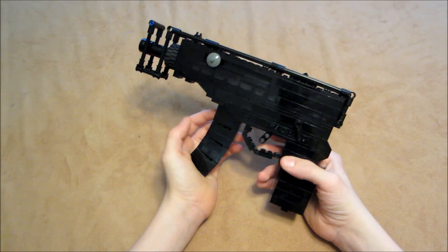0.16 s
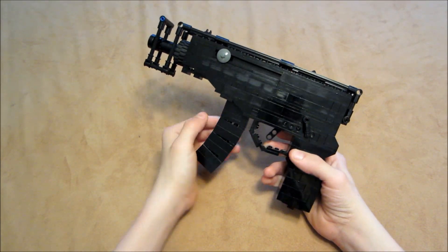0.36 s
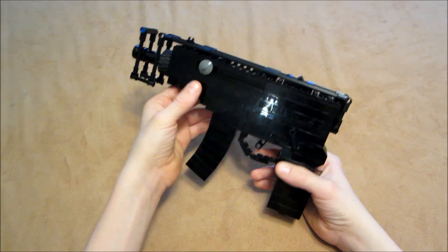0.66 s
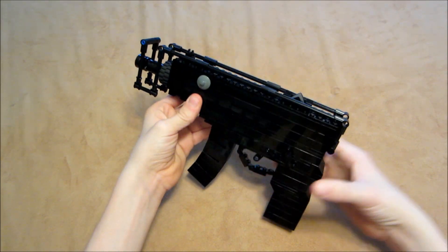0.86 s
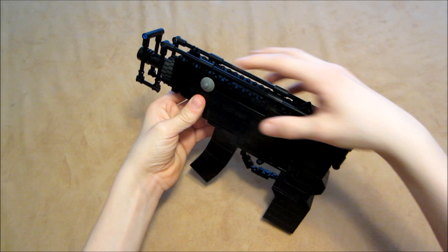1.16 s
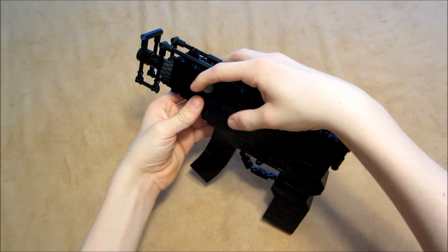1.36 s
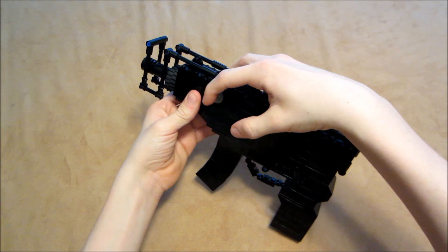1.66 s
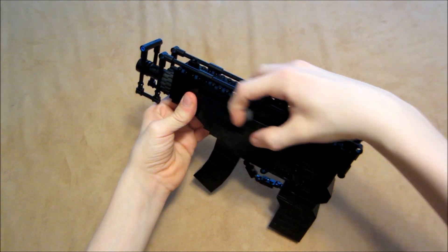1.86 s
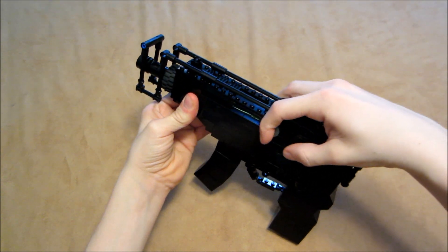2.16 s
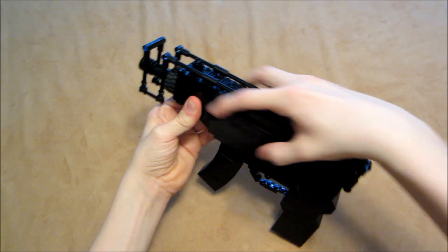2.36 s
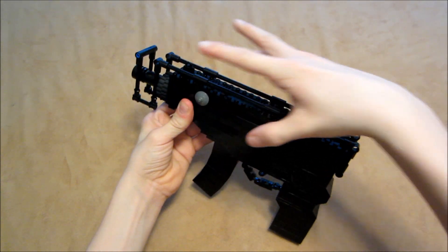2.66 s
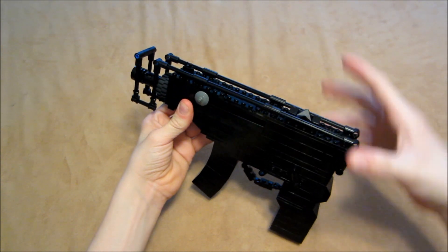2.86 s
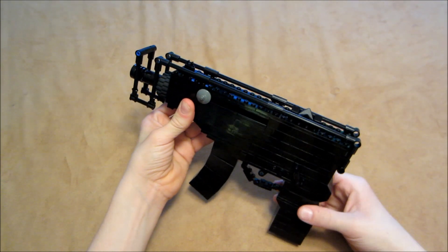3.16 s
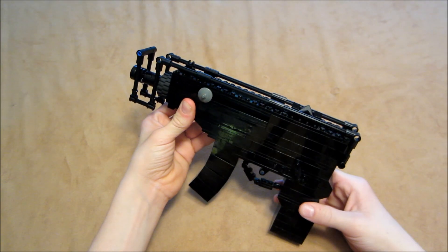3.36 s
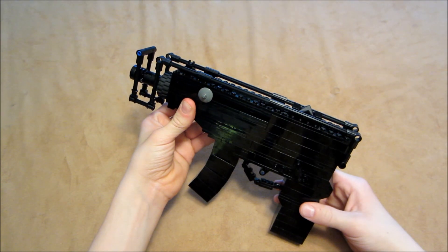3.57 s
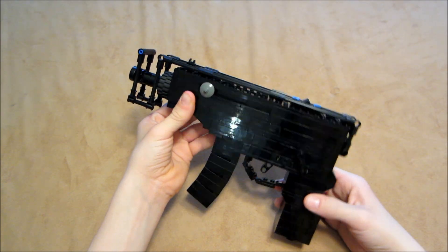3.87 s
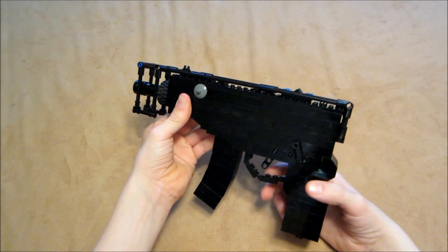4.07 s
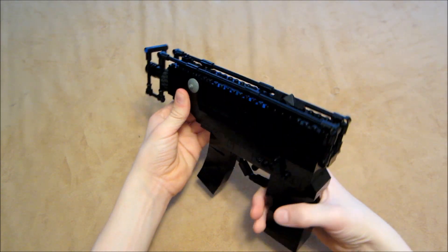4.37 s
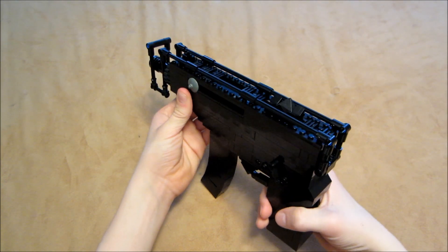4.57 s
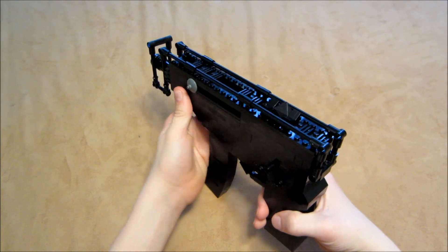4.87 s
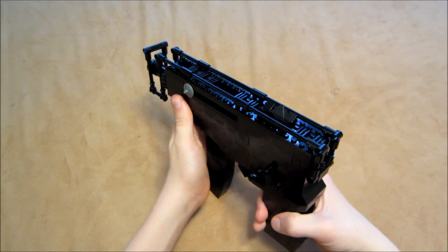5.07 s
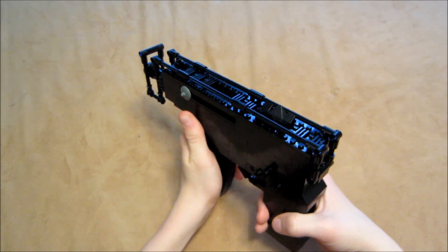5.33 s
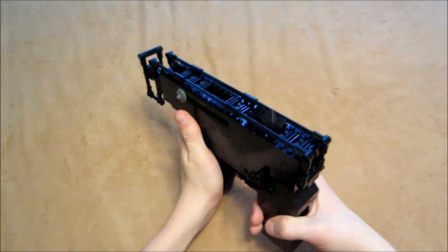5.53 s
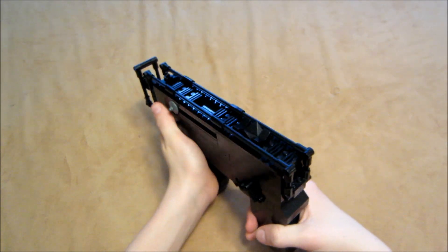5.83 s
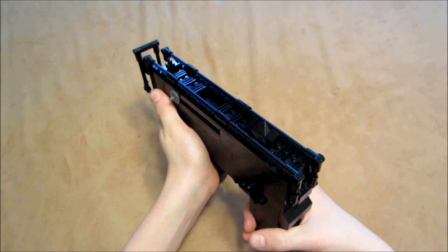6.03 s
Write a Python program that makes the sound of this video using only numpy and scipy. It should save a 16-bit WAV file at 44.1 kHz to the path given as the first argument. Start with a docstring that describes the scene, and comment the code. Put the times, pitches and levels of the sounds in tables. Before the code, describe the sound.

Hands turn over a hard plastic brick model in a quiet room: low table thumps, a flurry of clicks, then one sharp loud snap.

```python
"""A quiet room with a wooden table, on which a model of hard plastic bricks is handled.
Bumps ring the table's modes; bricks strike with filtered contacts and chatter, and loose ones rattle.
Sliding parts hiss and slip along the plastic, and one piece snaps home, ringing the hollow shell.
Fingers brush as swells of hiss; a lens motor ticks on a clock over air noise, sine hum and a fan whine."""
import sys
import numpy as np
from scipy import signal
from scipy.fft import rfft, irfft
from scipy.io import wavfile

SR = 44100
rng = np.random.default_rng(int(sys.argv[2]) if len(sys.argv) > 2 else 0)


def wav_out(sig):
    """Save sig, one row per channel (or a flat mono array), as 16-bit PCM at SR to the path in sys.argv[1]."""
    wavfile.write(sys.argv[1], SR, np.round(np.clip(np.atleast_2d(sig).T, -1, 1) * 32767).astype(np.int16))


N = 273420

# model bumps table: (time [s], level before the wood's low-pass [dB],
# contact low-pass [Hz], rebound high-pass [Hz])
KNOCKS = [(0.9493, -11.5, 184, 87), (0.9666, -16.5, 162, 87), (1.059, -34.5, 194, 80),
          (1.634, -34, 127, 70), (1.691, -34, 118, 55), (1.749, -31, 96, 35), (2.122, -31.5, 179, 98),
          (2.484, -29, 135, 45), (3.286, -24, 120, 69), (4.5972, -12, 633, 96), (4.605, -28, 520, 95),
          (4.6187, -17.5, 404, 65), (5.152, -35, 255, 50), (5.844, -38, 757, 250), (5.846, -21, 77.5, 30)]
# plastic pushed along plastic: (start [s], length [s], level [dB])
SLIDES = [(1.906, 0.1, -57.5), (2.446, 0.057, -48.5), (4.574, 0.023, -54.5), (5.456, .13, -59.5),
          (5.695, .07, -61.5)]

SLIDE_ATTACK_S, SLIDE_RELEASE_S = 0.025, 0.022  # time constants


def amp(db):
    """Decibels to gain."""
    return 10 ** (np.asarray(db) / 20)


def evened(x):
    """Scales to rms 1."""
    return x / np.sqrt(np.mean(x ** 2) + 1e-20)


def sized(x, span_s):
    """Scales a blow to the energy of rms 1 held for span_s."""
    return x / np.sqrt(np.sum(x ** 2) / (span_s * SR) + 1e-20)


def read(points, hz):
    """Interpolates a curve on a log-frequency axis."""
    f, value = np.transpose(points)
    return np.interp(np.log(hz + 1), np.log(f + 1), value)


def add(mix, time_s, sound):
    """Mixes a sound in at time_s."""
    part = mix[max(round(time_s * SR), 0):][:len(sound)]
    part += sound[:len(part)]


def coloured(x, points):
    """Filters a full-length sound by a dB curve."""
    gain = amp(read(points, np.fft.rfftfreq(N, 1 / SR)))
    return irfft(rfft(x) * gain, N)


def causal(gain, size=2048):
    """Minimum-phase impulse response with this gain, by folding the cepstrum."""
    cepstrum = irfft(np.log(gain + 1e-6))
    cepstrum[1:size // 2] *= 2
    cepstrum[size // 2 + 1:] = 0
    return irfft(np.exp(rfft(cepstrum)))


def bins(size=2048):
    """Frequencies [Hz] of a short impulse response."""
    return np.fft.rfftfreq(size, 1 / SR)


def background(air_rms_db=-52.5, waver=0.03):
    """Partly correlated stereo air noise, plus hum and whine lines that waver in level and phase."""
    # room air spectrum: (frequency [Hz], relative level [dB per Hz])
    air_colour = [(12, -24), (22, -9), (35, 1.5), (50, -8), (100, -6.5), (167, -8.5), (600, -18.5),
                  (1100, -23.5), (1430, -29), (1740, -30.5), (2720, -42.5), (6100, -47), (7600, -63.5),
                  (10000, -50), (13000, -46.5), (16000, -47.5)]
    # left-right correlation of the air: (frequency [Hz], correlation [1])
    likeness = [(30, 0.57), (120, 0.34), (500, 0.22), (1500, 0.19), (4000, 0.087), (15000, 0.09)]
    # mains hum and faint fan whine: (frequency [Hz], nominal rms before channel offset [dB])
    hum_lines = [(120, -55.5), (240, -65), (360, -68), (480, -73), (600, -73), (1089, -71.5), (1741, -87.5),
                 (7865, -99), (15735, -96.5)]
    t = np.arange(N) / SR
    a, b = rfft(rng.standard_normal((2, N)))
    same = np.clip(read(likeness, np.fft.rfftfreq(N, 1 / SR)), -1, 1)
    left_right = np.array([a, same * a + np.sqrt(1 - same ** 2) * b])
    air = evened(coloured(irfft(left_right, N), air_colour))
    knots = np.linspace(0, t[-1], num=40)
    hum = 0
    for hz, db in hum_lines:
        swell, drift = (np.interp(t, knots, row) for row in rng.standard_normal((2, len(knots))))
        level = np.sqrt(2) * amp(db) * (1 + waver * swell)
        phase = 2 * np.pi * (hz * t + rng.random()) + waver * drift * np.sqrt(hz / 120)
        hum += level * np.sin(phase)
    channel_offset = amp([[-0.5], [0.5]])
    return (amp(air_rms_db) * air + hum) * channel_offset


def rattle(decay_s, amount):
    """One contact, then a dying chatter of tiny ones, flattened to a fairly even spectrum."""
    t = np.arange(len(bins())) / SR
    force = rng.standard_normal(len(t)) * np.exp(-t / decay_s) * (1 - np.exp(-3 * t / decay_s))
    force *= amount / np.linalg.norm(force)
    force[0] = 1
    gain = abs(rfft(force, 2 * len(t) - 2))
    flattener = causal(1 / (gain + gain.mean() / 3))
    return signal.fftconvolve(force, flattener)[:2 * len(t)]


def ticks(span_s=0.0023, decay_s=0.0018, chatter=1.7, cycle_s=0.2085, beats_s=(0.0099, 0.1419),
          spread_db=1.8):
    """A lens motor steps on a steady clock, two thin ticks a cycle, while it adjusts."""
    # tick spectrum: (frequency [Hz], relative level [dB per Hz])
    tick_colour = [(500, -42), (2600, -18), (3800, 11.5), (5200, -4), (8000, -19), (12500, -0.5),
                   (16000, -19.5)]
    # spells of adjusting: (start [s], end [s], median tick level [dB])
    lens_spells = [(0.18, 1.72, -66.5), (3.3, 3.4, -62.5), (3.64, 3.82, -67.5), (4.14, 5.27, -67.5)]
    out, ring = np.zeros(N), causal(amp(read(tick_colour, bins())))
    clock = np.add.outer(np.arange(0, N / SR, cycle_s), beats_s).ravel()
    for start, end, db in lens_spells:
        for s in clock[(clock > start) & (clock < end)]:
            level = amp(db + spread_db * rng.standard_normal())
            tick = signal.fftconvolve(rattle(decay_s, chatter), ring)
            add(out, s, level * sized(tick, span_s))
    return out


def brushes():
    """Skin moving over the bricks gives soft swells of high hiss."""
    # strokes of skin: (middle [s], peak level [dB], half-length [s])
    brush_strokes = [(0.389, -62, .034), (0.725, -66, 0.19), (0.99, -65, 0.068), (1.66, -65.5, .11),
                     (1.998, -58.5, 0.26), (2.5, -60.5, 0.19), (4.983, -59, 0.067), (5.712, -62, 0.23),
                     (5.924, -64.5, .14)]
    # skin hiss spectrum: (frequency [Hz], relative level [dB per Hz])
    skin_colour = [(1000, 0), (3000, -12), (5500, -2.5), (7800, -19.5), (10000, -3), (12500, -3),
                   (16000, 6.5)]
    speed = np.zeros(N)
    for s, db, half_s in brush_strokes:
        add(speed, s - half_s, amp(db) * np.hanning(int(2 * half_s * SR)) ** 2)
    return speed * evened(coloured(rng.standard_normal(N), skin_colour))


def shell():
    """The hollow shell's short ring after one contact: decaying modes of alternating sign."""
    # brick shell modes: (frequency [Hz], relative level [dB], t60 [s])
    shell_modes = [(700, -22, .006), (1120, -17, .009), (1565, 0, .012), (2180, 0, .014), (2830, -14, .012),
                   (3680, -17, .009), (4450, -15, .007), (5000, -11, .008), (6600, -25, .003),
                   (9200, -19, .003), (10700, -9, .004), (11900, -13, .004), (13800, -12, .003)]
    t = np.arange(2 * len(bins()) - 2) / SR
    return sum((-1) ** k * amp(db - 60 * t / t60) * np.sin(2 * np.pi * hz * t)
               for k, (hz, db, t60) in enumerate(shell_modes))


def stroke(t, start, length, db):
    """Finger pressure builds, holds and lets go."""
    before = np.maximum(start - t, 0)
    after = np.maximum(t - start - length, 0)
    return amp(db) * np.exp(-before / SLIDE_ATTACK_S - after / SLIDE_RELEASE_S)


def slides(slips_per_s=450, spread_db=5, hiss_share=1.0, grit_hz=2400, ring_share=0.54):
    """Sliding plastic hisses, and catches in small uneven slips that knock and ring the shell."""
    # sliding hiss spectrum: (frequency [Hz], relative level [dB per Hz])
    slide_colour = [(200, 9.5), (700, 7.5), (1200, -2.5), (2200, -9), (2900, -20), (4800, -6.5),
                    (7800, -21), (11000, -8.5), (16000, -15)]
    t = np.arange(N) / SR
    slips = (rng.random(N) < slips_per_s / SR).astype(float)
    slips *= amp(spread_db * np.minimum(rng.exponential(1, N), 2.5))
    slips *= rng.choice([-1, 1], N)
    ring = signal.oaconvolve(slips, shell())[:N]
    band = signal.butter(N=3, Wn=[900, grit_hz], btype="band", fs=SR, output="sos")
    grit = evened(signal.sosfilt(band, slips)) + ring_share * evened(signal.sosfilt(band, ring))
    hiss = evened(coloured(rng.standard_normal(N), slide_colour))
    pressure = sum(stroke(t, *row) for row in SLIDES)
    return pressure * evened(evened(grit) + hiss_share * hiss)


def bumps(push_db=-12.5, follow_db_per_db=0.42, soft_hz=140, low_hz=70, lead_s=0.01195):
    """All bumps on the table: the knocks, and the soft push just before each stroke."""
    pushes = [(s - lead_s, push_db + follow_db_per_db * db, soft_hz, low_hz) for s, _, db in SLIDES]
    return KNOCKS + pushes


def knocks(span_s=0.0035):
    """Each bump rings the table top; a soft contact reaches only the low modes."""
    # table modes, a mix of short thuds and longer rings: (frequency [Hz], relative level [dB], t60 [s])
    table_modes = [(79.8, 2, 0.25), (117.5, 10, 0.14), (284, 2, 0.039), (431, 4, 0.053), (61.4, 0.5, 0.44),
                   (133, 0.5, 0.25), (175, -1, 0.14), (211.8, -5, 0.35), (251.5, -1, 0.26),
                   (304.5, 0.5, 0.2), (406, -4, 0.16), (477, -9, 0.37), (513, -23, 0.51), (543, -23, 0.18),
                   (670, 2.5, 0.11), (727, -7.5, 0.28), (842, -17.5, 0.82)]
    t, out = np.arange(SR * 3 // 4) / SR, np.zeros(N)
    ring = sum(amp(db - 60 * t / t60) * np.cos(2 * np.pi * hz * t) for hz, db, t60 in table_modes)
    for s, db, soft_hz, low_hz in bumps():
        contact = signal.butter(N=3, Wn=soft_hz, fs=SR, output="sos")
        rebound = signal.butter(N=2, Wn=low_hz, btype="high", fs=SR, output="sos")
        blow = signal.sosfilt(np.vstack([contact, rebound]), ring)
        add(out, s, amp(db) * sized(blow, span_s))
    wood = signal.butter(N=4, Wn=900, fs=SR, output="sos")  # wood passes little treble
    return signal.sosfilt(wood, out)


def loose_bricks(count=6, shake_db=-31, shake_gap_s=0.014, fade_db_per_s=130,
                 catch_db=6.5, catch_gap_s=0.02, spread_db=3,
                 median_hz=1586, spread_oct=0.35, treble_db=-12, chatter_s=0.0052):
    """Small uneven clicks: a dying few shaken out by each knock, and catches along each stroke."""
    shaken = [(s + wait, db + shake_db - fade_db_per_s * wait) for s, db, _, _ in KNOCKS
              for wait in shake_gap_s * (np.arange(count) + rng.random(count))]
    caught = [(s + wait, db + catch_db) for s, length, db in SLIDES
              for wait in catch_gap_s * (np.arange(2 * count) + rng.random(2 * count))
              if wait < length + SLIDE_RELEASE_S]
    events = shaken + caught
    chance = rng.standard_normal((len(events), 2))
    return [(s, db + spread_db * force, treble_db, median_hz * 2 ** (spread_oct * part), chatter_s)
            for (s, db), (force, part) in zip(events, chance)]


def clicks(span_s=0.001, chatter=2.8, treble_hz=2500, part_db=7, part_width_hz=110):
    """Brick strikes brick: a sharp contact and brief chatter ring the struck part at its own pitch. One faint
    bright click at 3.26 s is a tick of the lens motor."""
    # strikes, and one lens tick at 3.26 s: (time [s], level [dB], treble tilt reached two octaves above
    # treble_hz [dB], pitch of the struck part [Hz], chatter decay [s])
    strikes = [(0.3873, -47.5, -8, 1240, 0.001), (0.953, -42, 4, 4360, .0025),
               (0.959, -33, -10, 1810, 0.0089), (1.355, -47, -7, 1220, 0.011),
               (1.374, -41.5, 6, 1330, 0.0058), (1.4335, -45, -21.5, 1160, 0.0014),
               (1.468, -45.5, 7, 2420, 0.0036), (1.521, -49.5, -5, 1440, 0.011),
               (1.896, -37.5, -26, 2030, 0.0076), (2.0, -28, -4.5, 1470, 0.0019),
               (2.0451, -40.5, -18, 1180, 0.0014), (2.061, -43.5, 2, 2320, 0.0032),
               (2.124, -44.5, -8, 1310, 0.0027), (2.183, -33.5, 18, 2290, .0026),
               (2.372, -36, 16.5, 4060, .0008), (2.3835, -35, 18, 1030, 0.0013),
               (2.391, -38, 13, 2110, .0012), (2.397, -37.5, 13, 2142, 0.0024),
               (2.4297, -35.5, -4, 2000, .004), (2.4602, -27.5, 9, 1200, 0.00098),
               (2.502, -40, 9, 1130, .002), (3.2623, -52.5, 12, 3700, 0.0012),
               (4.481, -43.5, 6, 1320, 0.004), (4.548, -36.5, -2, 1180, 0.0092),
               (4.592, -32, -3, 1180, 0.0035), (4.605, -30.5, -6, 2970, 0.0015),
               (4.615, -33.5, 1, 3080, 0.0017), (4.929, -49, 5, 2170, 0.0055),
               (5.148, -42, -2, 1330, 0.0019), (5.4797, -23, 12.5, 2170, 0.0021),
               (5.8438, -39.5, 0, 1210, .0014)]
    # click spectrum: (frequency [Hz], relative level [dB per Hz])
    click_colour = [(150, -20.5), (500, 2), (900, 1.5), (1300, 1.5), (2200, -1), (2900, -9.5), (3700, -8.5),
                    (5000, -11.5), (7800, -30), (11000, -20), (16000, -21)]
    hz, out = bins(), np.zeros(N)
    treble = np.clip(np.log2(hz / treble_hz + 1e-9) / 2, 0, 1)
    for s, db, treble_db, part_hz, decay_s in strikes + loose_bricks():
        part = 1 + amp(part_db) / (1 + ((hz - part_hz) / part_width_hz) ** 2)
        ring = causal(part * amp(read(click_colour, hz) + treble_db * treble))
        force = rattle(decay_s, chatter * np.sqrt(decay_s * 1000))  # longer chatter is stronger
        add(out, s, amp(db) * sized(signal.fftconvolve(force, ring), span_s))
    return out


def snap(span_s=0.00066, decay_s=0.0006, chatter=0.33, crack_db=-11):
    """One hard contact gives a dull crack and rings the whole shell cleanly."""
    # a piece snaps home: (time [s], level of the shell ring [dB])
    snaps = [(5.481, -12)]
    # crack spectrum: (frequency [Hz], relative level [dB per Hz])
    crack_colour = [(150, -15), (500, -6), (1100, 8), (3000, -3), (8000, -14), (16000, -23)]
    out = np.zeros(N)
    crack = sized(causal(amp(read(crack_colour, bins()))), span_s)
    ring = sized(shell(), span_s) + amp(crack_db) * crack
    for s, db in snaps:
        add(out, s, amp(db) * signal.fftconvolve(rattle(decay_s, chatter), ring))
    return out


def ports(x, left_lag_s=2.3e-5):
    """Two close microphone ports hear the direct sound with a small lag and imbalance."""
    # port imbalance: (frequency [Hz], left minus right [dB])
    port_balance = [(60, -0.3), (300, -1), (1200, -2), (2200, -4.5), (4400, -1.5), (8000, -.7),
                    (13000, -0.3)]
    hz = np.fft.rfftfreq(N, 1 / SR)
    half = amp(read(port_balance, hz) / 2) * np.exp(-1j * np.pi * hz * left_lag_s)
    return irfft(rfft(x) * np.array([half, 1 / half]), N)


def room(x, gap_s=0.00086, width=0.29, taps_per_s=4000):
    """Sparse reflections, each band dying at its own speed, much alike at the two ports."""
    # reverberation: (frequency [Hz], t60 [s])
    decay_times = [(60, 0.38), (250, 0.42), (750, 0.5), (2000, 0.2), (5000, 0.19), (15000, .16)]
    size = SR * 3 // 4
    taps = rng.choice([-1., 1.], (2, size)) * (rng.random((2, size)) < taps_per_s / SR)
    taps *= np.arange(size) > gap_s * SR
    hz, t, z = signal.stft(taps, SR, nperseg=256)
    decay = amp(-60 * t / read(decay_times, hz)[:, None])
    mid, side = signal.istft(z * decay, SR, nperseg=256)[1]
    tail = np.array([mid + width * side, mid - width * side])
    return signal.fftconvolve(x[None], tail / np.linalg.norm(tail[0]), axes=1)[:, :N]


def scene():
    """Table and plastic, heard directly and through the room, over the background."""
    # colour of the room's return: (frequency [Hz], gain [dB])
    echo_colour = [(60, 3.5), (200, 2), (700, 0.5), (2000, -0.5), (4000, -4), (8000, -5.5), (15000, -16.5)]
    small = ticks() + brushes()
    plastic = slides() + clicks()
    wood, latch = knocks(), snap()
    sent = amp(-11.5) * wood + amp(-7.0) * plastic + amp(-18.5) * latch + amp(-12) * small
    direct = ports(wood + plastic + latch + small)
    return direct + room(coloured(sent, echo_colour)) + background()


def record(dry, edge_hz=15980):
    """The recorder's band limit, a linear-phase low-pass."""
    low_pass = signal.firwin(511, edge_hz, window=("kaiser", 9), fs=SR)
    return signal.oaconvolve(dry, low_pass[None], "same")


dry = scene()
out = record(dry)
wav_out(out)
```